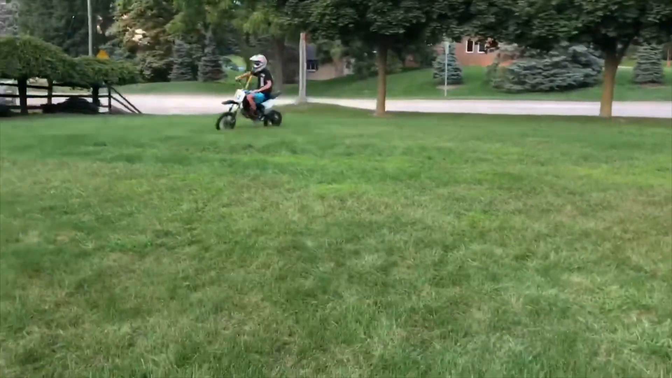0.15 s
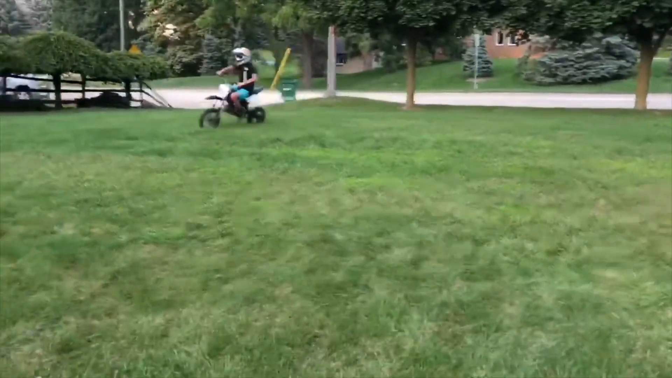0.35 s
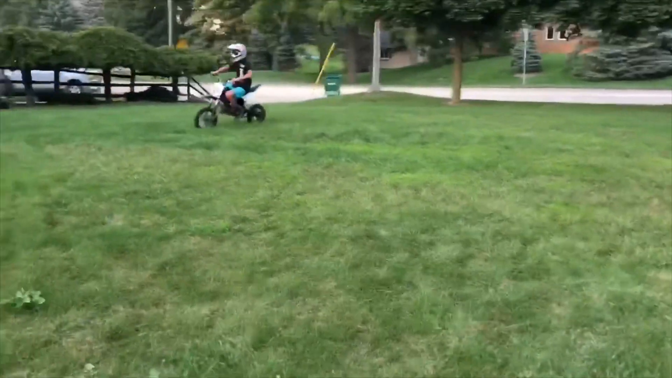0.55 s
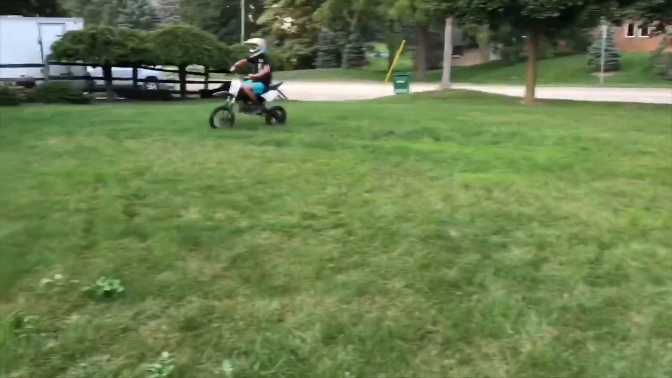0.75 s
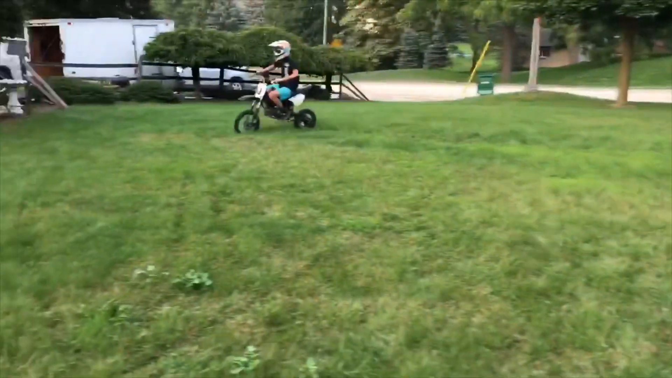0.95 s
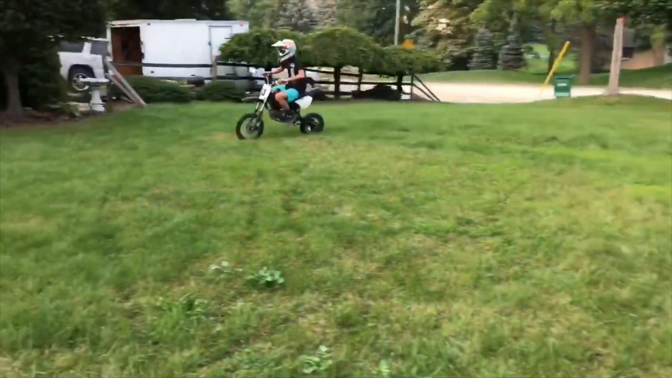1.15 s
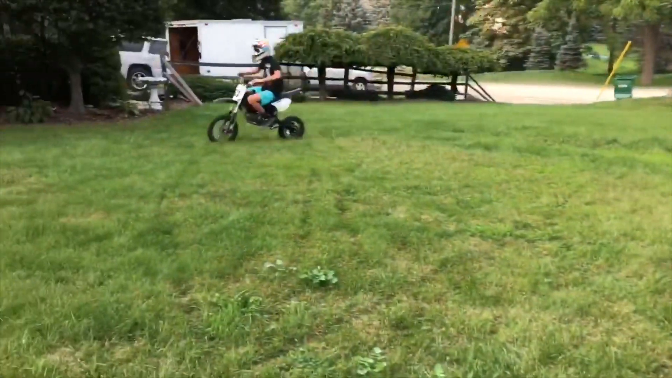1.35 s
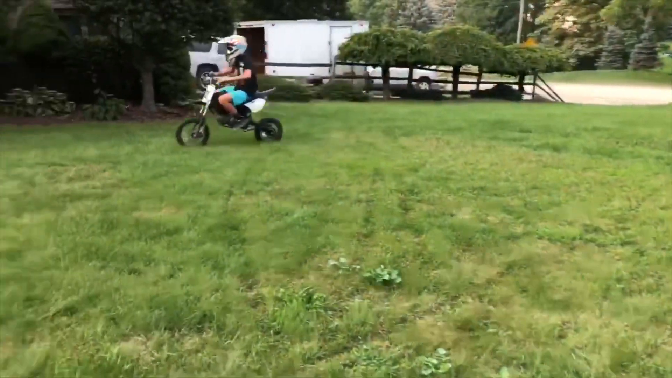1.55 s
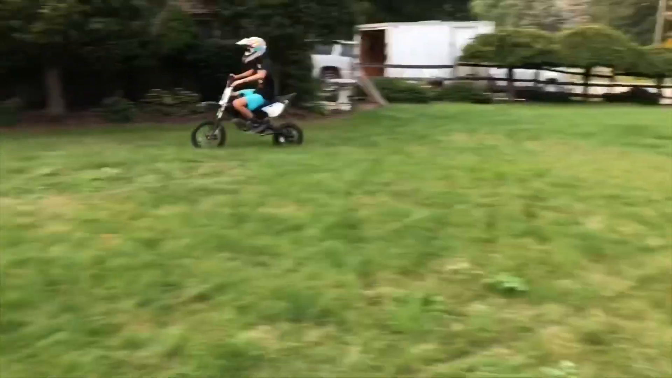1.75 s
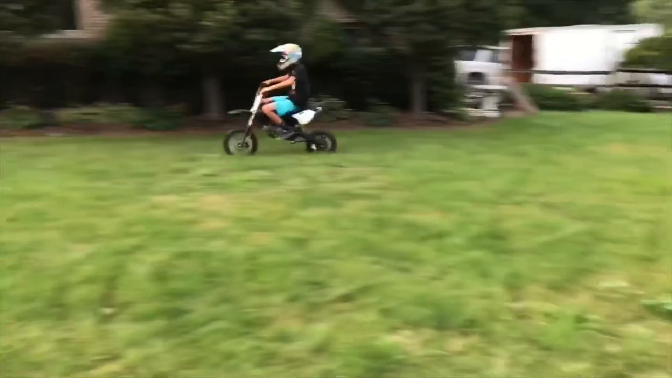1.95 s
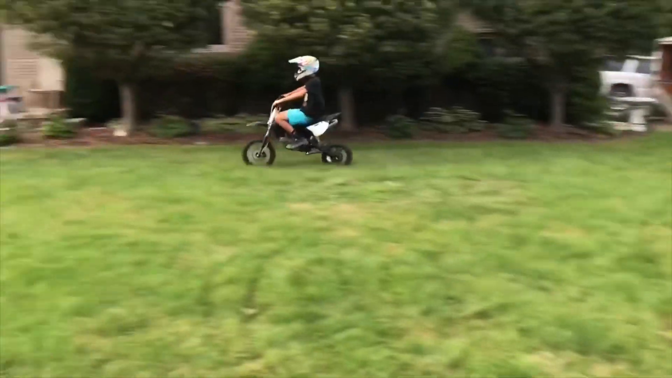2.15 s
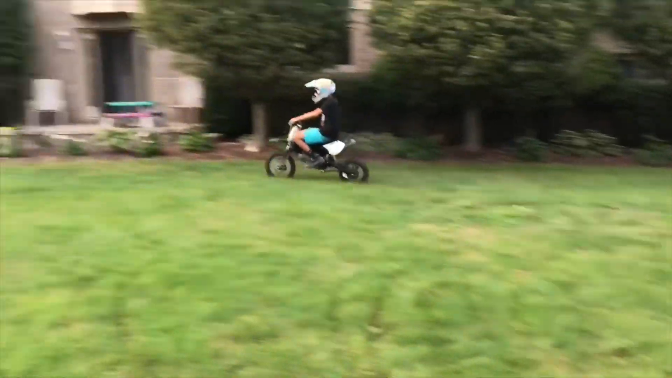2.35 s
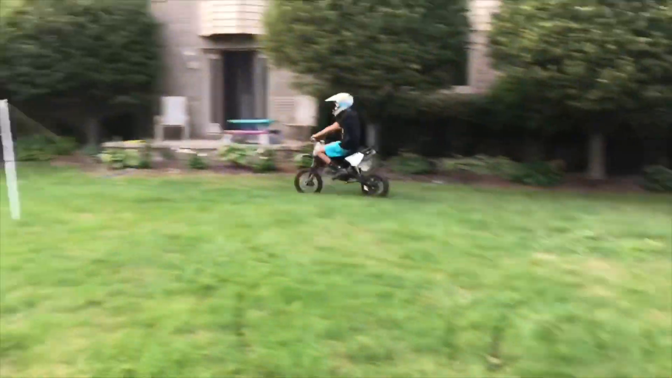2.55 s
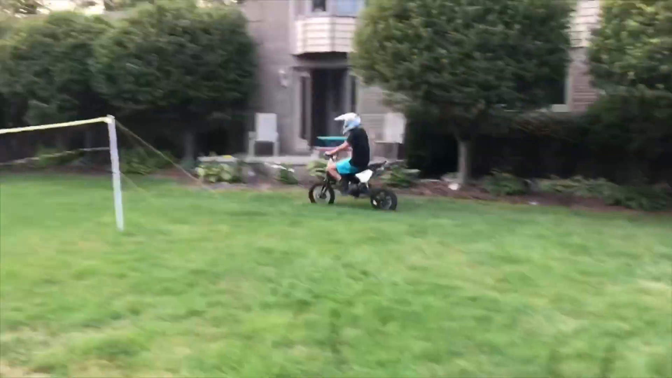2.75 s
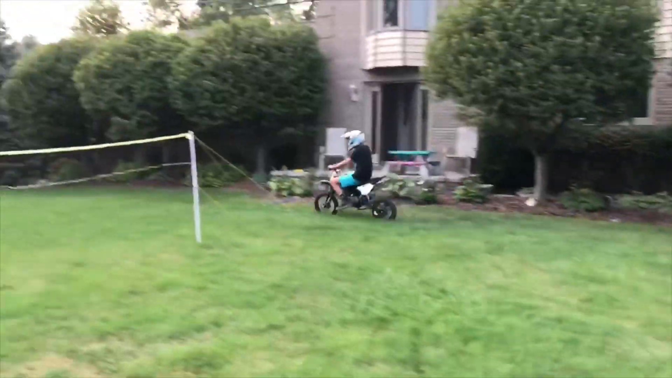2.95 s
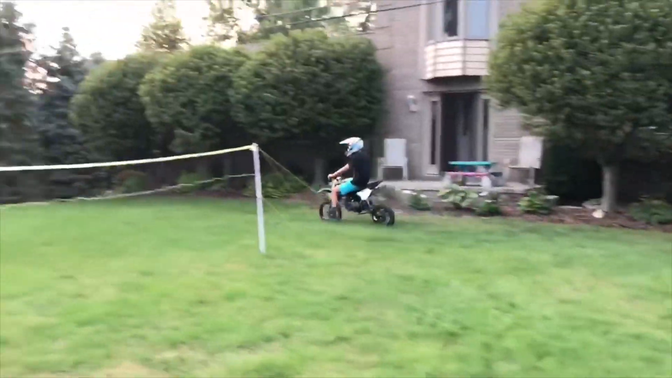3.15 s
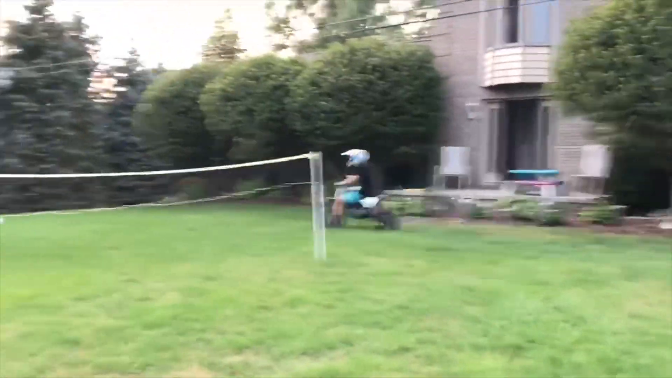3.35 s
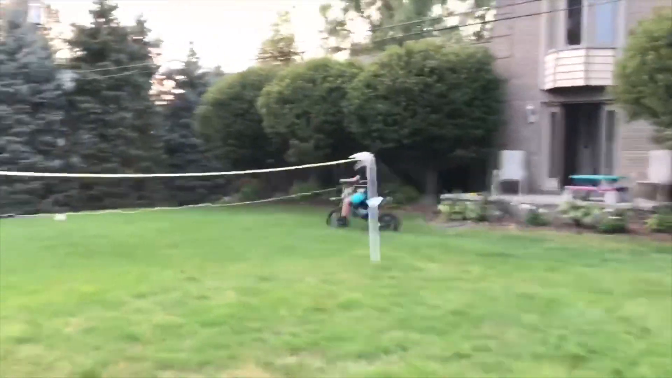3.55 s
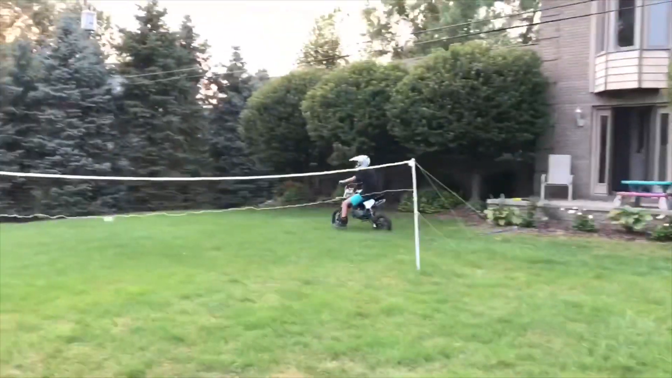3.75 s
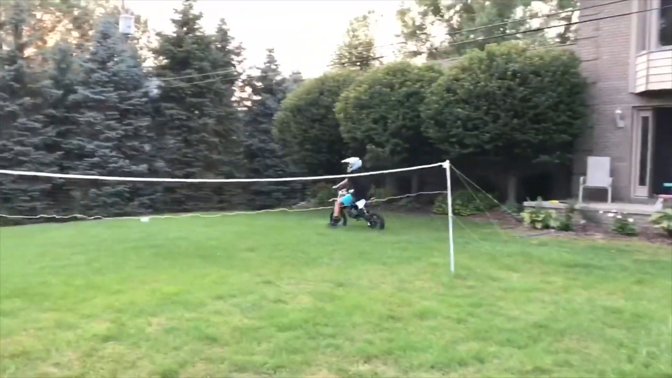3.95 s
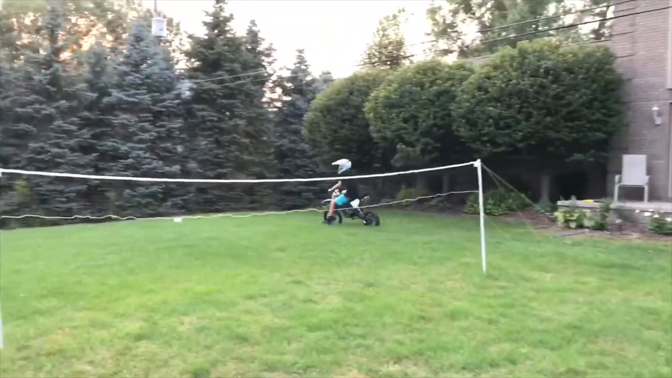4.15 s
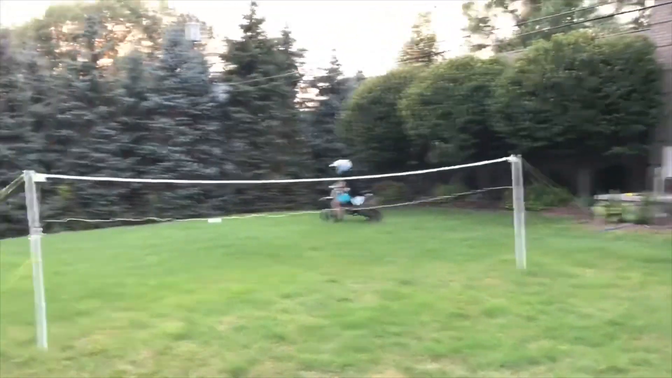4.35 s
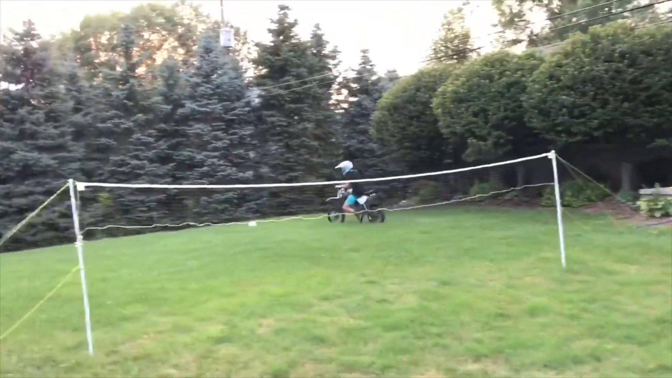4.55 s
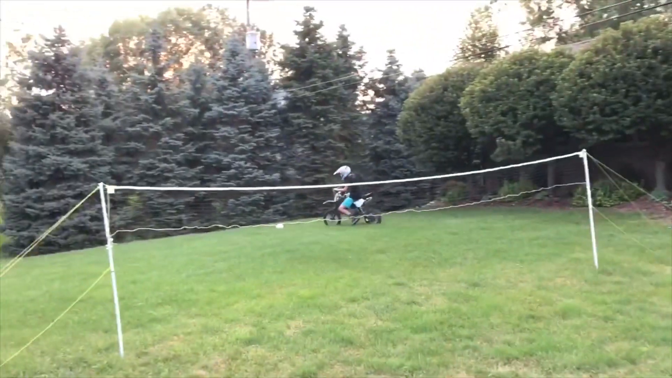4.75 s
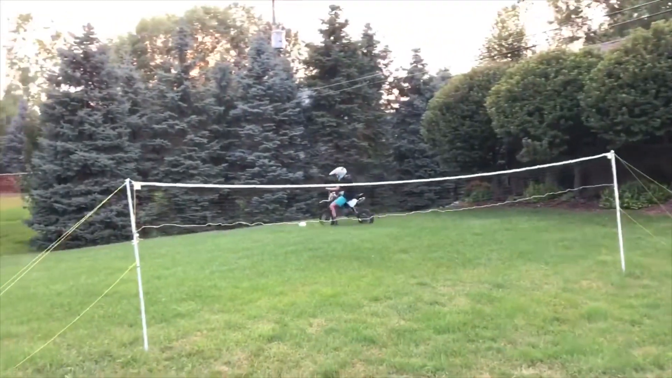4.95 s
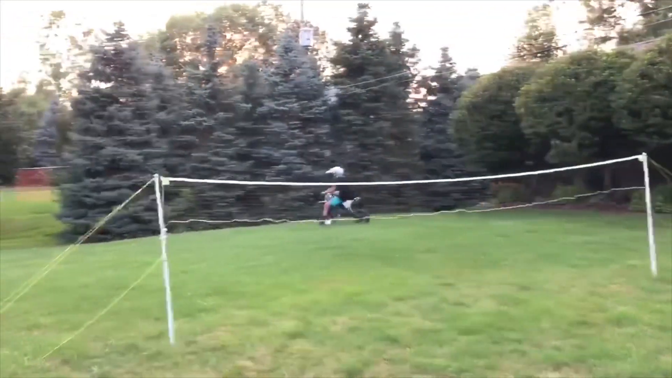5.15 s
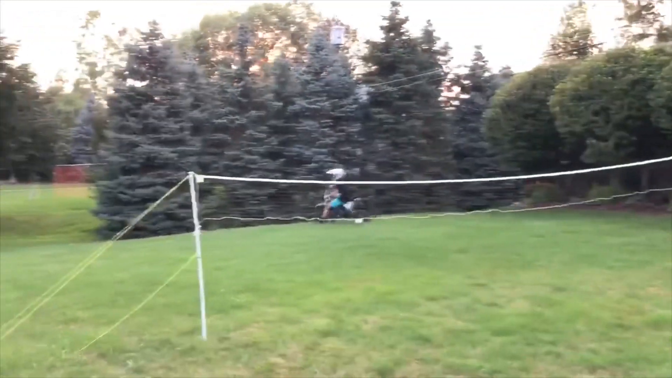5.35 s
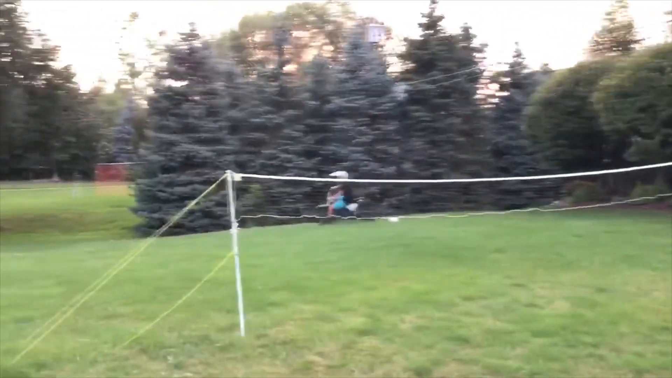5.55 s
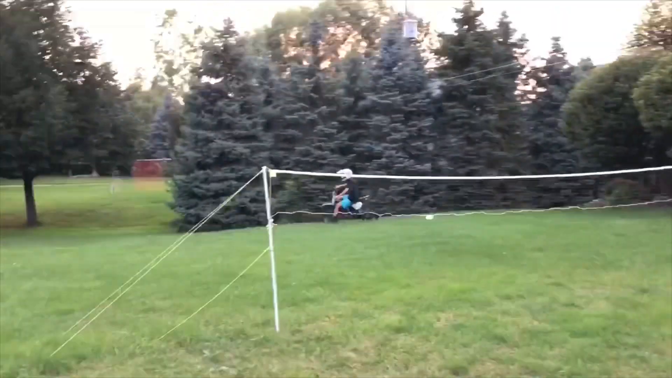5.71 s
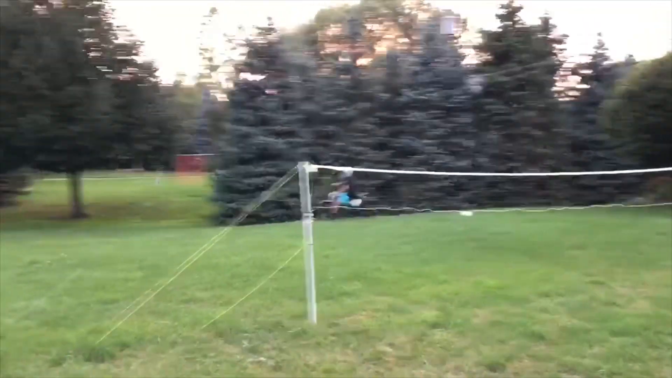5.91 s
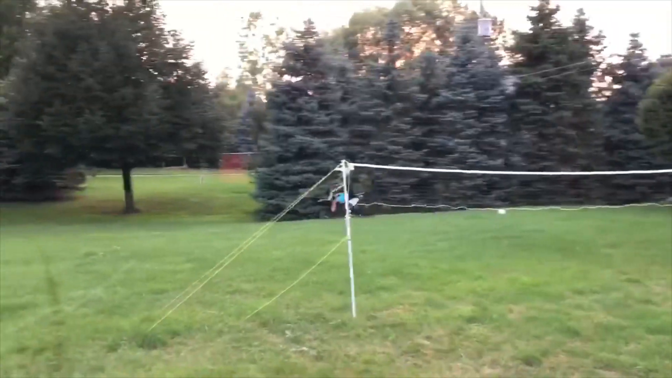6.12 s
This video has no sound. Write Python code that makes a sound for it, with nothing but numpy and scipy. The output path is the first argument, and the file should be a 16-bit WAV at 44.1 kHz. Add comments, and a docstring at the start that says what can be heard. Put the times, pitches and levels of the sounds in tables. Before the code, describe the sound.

Heard from a fixed spot in an open yard, a little single-cylinder bike approaches with short throttle blips, growls by with a longer raspy pull, then coasts down to a slow hollow putter with loose chain rattling. It revs up again facing away, drops, stumbles briefly, and climbs once more as it recedes. Mono, slight wall reflection, quiet air beneath.

```python
"""A small four-stroke single-cylinder motorbike barks at every firing as it is ridden round a lawn and past.
Off the throttle its pipe only booms hollowly as the revs sink; then the bike turns its tail and moves off.
The exhaust is a train of minimum-phase pulses, one a cycle; gas, engine and tyres are shaped noise.
The slack chain slaps over bumps as noise bursts ringing in steel; house and trees return a faint echo."""
import sys
import numpy as np
from scipy import signal
from scipy.fft import rfft, irfft, next_fast_len
from scipy.io import wavfile
from scipy.ndimage import uniform_filter1d

SR = 44100
rng = np.random.default_rng(int(sys.argv[2]) if len(sys.argv) > 2 else 0)


def log_audio(samples):
    """Write samples as a 16-bit WAV file to the path given in sys.argv[1]."""
    # one column per channel
    frames = np.atleast_2d(samples).T
    # limit to full scale, then quantise
    limited = np.clip(frames, -1, 1)
    pcm = np.round(limited * 32767).astype(np.int16)
    wavfile.write(sys.argv[1], SR, pcm)


N = 272538
T = np.arange(N) / SR
TAPS = 4096  # samples in a pulse or impulse response
HZ = np.fft.rfftfreq(TAPS, 1 / SR)

# Exhaust pulse spectra, relative, side-on, from behind and coasting: (f/Hz, level/dB)
LOADED_PULSE = [(25, -89), (42, -27), (52, -17), (80, -3.5), (105, 3.5), (140, -1), (170, -10), (280, -9.5),
                (360, -9.5), (450, -14), (780, -12), (950, -16.5), (1100, -29), (1400, -32), (2400, -46),
                (5000, -37)]
ASTERN_PULSE = [(25, -107), (38, -32), (50, -10), (72, 0.5), (98, 10.5), (145, 2), (200, 5.5), (270, -1),
                (360, -3), (490, -16), (620, -15.5), (800, -23), (1050, -21), (2500, -72.5), (5000, -46)]
HOLLOW_PULSE = [(25, -59), (45, -46), (62, -17), (78, -6.5), (95, 11.5), (125, 4), (195, 3), (250, -3.5),
                (320, -10.5), (385, -29), (620, -29.5), (1100, -35), (1500, -42), (3000, -55.5)]
# Pipe resonances under load, and with cooler gas when coasting: (f/Hz, width/Hz, lift/dB)
HOT_PIPE = [(136.4, 16, 5), (200.7, 33, 10.5), (292.5, 6.8, -6.5), (314, 104, 10), (385.3, 11.5, 4.5),
            (462, 21.5, -8.5), (477.4, 11, 11.5), (730, 400, 9.5)]
COOL_PIPE = [(98.4, 9.1, -1.5), (125, 4.1, 7), (141.8, 5.1, 2), (169, 5.7, -2.5), (184, 17, 2),
             (243, 2.5, 1), (302, 13.5, 3)]


def exhaust():
    """Pipe resonance: sharp pulses excite the pipe under load, round ones when coasting."""
    steady = dict(uneven_db=0.45, bark_uneven_db=0.6, jitter_s=0.00003)
    passing = firings("side-on", read(LOADED_PULSE, HZ) + peaks_db(HOT_PIPE), **steady)
    leaving = firings("astern", read(ASTERN_PULSE, HZ), **steady)
    coasting = firings("coasting", read(HOLLOW_PULSE, HZ) + peaks_db(COOL_PIPE), **steady)
    pulses = gain_of(0.27) * passing + gain_of(-1.0) * leaving + gain_of(0.42) * coasting
    return silencer(silencer(pulses, hz=580, q=0.51), hz=200, q=0.33)


# Uneven firings as the engine stumbles: (t/s, level change/dB)
STUMBLES = [(4.545, -1), (4.573, -11), (4.6, -3.5), (4.625, 3.5), (4.652, -3), (4.7, -2), (4.76, 3.5)]


def firings(state, colour_db, uneven_db, bark_uneven_db, jitter_s):
    """Periodic excitation: one pressure pulse a cycle, whose boom, body and bark follow the engine's effort."""
    times = T[1:][np.diff(np.floor(cycles())) > 0]
    states, levels = effort(times)
    chosen = states == state
    times, levels = times[chosen], levels[chosen, :3]

    # power shares that cross over at 135 Hz and 450 Hz
    above_boom = 1 / (1 + (135 / (HZ + 1)) ** 6)
    above_body = 1 / (1 + (450 / (HZ + 1)) ** 10)
    shares = np.array([1 - above_boom, above_boom - above_body, above_body])
    parts = shares * gain_of(colour_db) ** 2
    parts /= 2 * parts.sum(1, keepdims=True) / TAPS  # each part carries unit energy

    stumble_s, stumble_db = np.transpose(STUMBLES)
    out = np.zeros(N)
    chances = rng.standard_normal((len(times), 3))
    for s, level, (size, bark, late) in zip(times, levels, chances):
        period = 1 / follow(SPEED, s)[0]
        db = level + uneven_db * size + [0, 0, bark_uneven_db * bark]
        db += stumble_db[abs(stumble_s - s) < period / 2].sum()
        power = gain_of(db) ** 2 @ parts * period * SR
        add(out, s + jitter_s * late, causal(np.sqrt(power)))
    return out


def silencer(x, hz, q):
    """All-pass dispersion: a chamber delays the part of each pulse near its resonance, so its pitch sweeps down."""
    _, poles = signal.iirpeak(hz, q, fs=SR)
    return signal.lfilter(poles[::-1], poles, x)


# Engine speed: (t/s, firing rate f/Hz)
SPEED = [(0.0, 44.05), (0.15, 49.41), (0.42, 52.65), (0.6, 47.48), (0.76, 51.93), (1.05, 45.93),
         (1.17, 39.39), (1.28, 42.91), (1.35, 42.67), (1.86, 50.27), (2.01, 52.5), (2.11, 47.08),
         (2.66, 38.14), (3.09, 28.53), (3.28, 32.42), (3.5, 46.78), (3.66, 51.94), (4.08, 39.42),
         (4.49, 37.8), (4.7, 39.01), (4.94, 35.2), (5.33, 36.77), (5.73, 50.21), (6.18, 49.2)]


def cycles(start=0.765):
    """Phase is the integral of rate: engine cycles so far; the exhaust valve opens at each whole number."""
    return start + np.cumsum(follow(SPEED, T)[0]) / SR


# Throttle moves, each held until the next; source levels at NEAR_M and CRUISE_HZ before the sources' own trims:
# (t/s, throttle, boom level/dB, silencer body level/dB, bark level/dB, gas rasp level/dB)
THROTTLE = [(0, "shut", -18, -15, -45, -37), (0.04, "open", -22.5, -20.5, -36.5, -32.5),
            (0.475, "shut", -22.5, -18.5, -45, -39), (0.62, "open", -25, -19.5, -32, -31),
            (0.805, "shut", -22.5, -20.3, -42, -39.5), (1.0, "open", -21, -21.5, -26, -29.5),
            (2.1, "shut", -19.5, -18.5, -44.5, -39.5), (3.13, "open", -26.5, -23, -35, -38),
            (3.735, "shut", -18, -18, -37.5, -37), (4.77, "open", -22, -24, -42.5, -35.5),
            (5.2, "open", -22.5, -19.5, -34.5, -35), (5.9, "open", -26, -21.5, -35, -35.5),
            (6.12, "shut", -19.5, -27, -40, -37)]
# Gain with engine speed, by state: (boom, body, bark, rasp; level/dB per extra firing a second)
REV_DB = {"side-on": (-0.11, -0.15, 0.76, 0.43), "astern": (0.23, 0.23, 0.72, 0.75),
          "coasting": (-0.036, 0.45, 0.74, 0.36)}
NEAR_M, CRUISE_HZ = 8, 45
TURN_S, TURNING_S = 3.19, 0.63  # the bike turns its tail to the listener
# The tuples below are level changes/dB of (boom, body, bark, rasp).
# The charge builds after the throttle opens and thins as it is rolled off.
OPENING_DB, OPENING_S = (0.5, -2.5, -13, -4.5), 0.033
CLOSING_DB, CLOSING_S = (-3, -7.5, -12.5, -6.5), 0.047
# After the throttle shuts the boom takes a moment to build; one that stays open glides to its new setting.
SETTLE_DB, SETTLE_S, GLIDE_S = (-5.5, -1, -2, 1), 0.31, 0.077
# Towards the end of a coast the firings sag, over this share of it.
SAG_DB, SAG_SHARE, SAG_S = (-4, -7.5, -5.5, -2.5), 0.16, 0.013
# Seen side-on, the boom swells where the revs come into tune with the pipe.
TUNED_HZ, TUNED_WIDTH_HZ, TUNED_DB = 52.2, 3.2, 6


def effort(t):
    """Load dependence: engine state, and boom, body, bark and rasp levels from throttle, revs and distance."""
    rate = follow(SPEED, t)[0][:, None]
    states, levels = np.full(len(t), "coasting"), np.zeros((len(t), 4))
    before = THROTTLE[:1] + THROTTLE[:-1]
    after = THROTTLE[1:] + [(N / SR + GLIDE_S, "shut")]
    for (_, was, *old_db), (start, throttle, *db), (end, then, *_) in zip(before, THROTTLE, after):
        now = (t >= start) | (start == THROTTLE[0][0])
        age = np.maximum(t - start, 0)[:, None]
        left = np.maximum(end - t, 0)[:, None]
        if throttle == "shut":
            state = "coasting"
            attack = np.exp(-age / SETTLE_S) * SETTLE_DB
            sag = (1 + np.tanh((SAG_SHARE * (end - start) - left) / SAG_S)) / 2
            release = sag * SAG_DB
        else:
            state = "side-on" if end < TURN_S else "astern"
            if was == "shut":
                attack = np.exp(-age / OPENING_S) * OPENING_DB
            else:
                attack = np.exp(-age / GLIDE_S) * np.subtract(old_db, db)
            release = np.exp(-left / CLOSING_S) * CLOSING_DB * (then == "shut")
        level = db + attack + release + (rate - CRUISE_HZ) * REV_DB[state]
        if state == "side-on":
            level[:, :1] += TUNED_DB / (1 + ((rate - TUNED_HZ) / TUNED_WIDTH_HZ) ** 4)
        states[now], levels[now] = state, level[now]  # later moves overwrite earlier ones
    return states, levels + spreading_db(t)[:, None]


# The ride past: (t/s, distance/m)
PATH = [(0, 17.8), (1, 11.06), (1.95, 9), (3, 11), (4, 13.7), (6.18, 22.7)]


def spreading_db(t):
    """Spherical spreading: pressure falls in inverse proportion to distance."""
    return 20 * np.log10(NEAR_M / follow(PATH, t)[0])


# Gas noise, relative: (f/Hz, level/dB per Hz)
RASP = [(300, 3), (600, -7.5), (900, 3.5), (1100, -8.5), (1400, 2.5), (1700, -1), (2000, -8.5), (2350, -7),
        (3000, -8.5), (4200, -12), (5000, -13.5), (7500, -14.5), (15000, -22)]


def rasp():
    """Modulated jet noise: gas tears out as the exhaust valve opens; the intake draws with a softer rush."""
    turn, slow = cycles(), T[::100]
    states, levels = effort(slow)
    pulling = np.interp(T, slow, states != "coasting")
    level_db = np.interp(T, slow, levels[:, -1])
    tear = 1.7 * burst(turn, at=0.025, width=0.055)
    rush = 0.5 * burst(turn, at=0.73, width=0.55)
    puffs = 0.5 + pulling * (tear + rush)
    puffs /= np.sqrt(uniform_filter1d(puffs ** 2, size=2000))  # keeps the running rms even
    gas = noise(RASP, band=(1150, 2600))
    return gain_of(level_db - 5.5) * puffs * gas


def burst(turn, at, width):
    """Cyclic modulation: a smooth swell once a cycle, centred on the share 'at' of the cycle."""
    return np.exp(-(np.sin(np.pi * (turn - at)) / (np.pi * width)) ** 2)


# Machinery noise, relative, side-on and from behind: (f/Hz, level/dB per Hz)
HISS_SIDE_ON = [(300, -4), (600, 0.5), (1000, 0), (1500, -3), (2500, 3.5), (3300, 1.5), (4200, -0.5),
                (7000, -1.5), (10000, -2.5), (14000, -3), (15800, -10)]
HISS_ASTERN = [(300, -24), (600, 7.5), (950, 0.5), (1400, -11.5), (2000, 5.5), (2600, 3.5), (3500, 5),
               (4500, 2), (7000, -4), (8800, -1), (11000, -3.5), (14000, -2.5), (15800, -15)]
# Machinery level, before each source's own trim: (t/s, level/dB)
HISS_LEVEL = [(0, -40), (0.14, -38.5), (0.42, -39.5), (0.55, -43), (0.74, -39), (0.96, -40), (1.05, -37),
              (1.22, -38.5), (1.7, -35), (2.02, -31), (2.14, -36.5), (2.42, -35.5), (2.7, -38),
              (3.68, -38.5), (3.97, -43), (4.55, -45.5), (5.25, -46.5), (5.5, -42), (5.75, -39.5),
              (6.18, -44)]


def machinery():
    """Broadband friction noise: valve gear, chain rollers and tyres in grass, recoloured as the bike turns away."""
    ticking = 1 + 0.12 * burst(2 * cycles(), at=0.19, width=0.03)  # twice a cycle
    grain = gain_of(2.27 * drift(500) + 1.14 * drift(35))
    side_on, astern = (noise(colour, band=(4000, 15000)) for colour in (HISS_SIDE_ON, HISS_ASTERN))
    turned = np.clip((T - TURN_S) / TURNING_S, 0, 1)
    hiss = np.sqrt(1 - turned) * side_on + np.sqrt(turned) * astern  # equal-power crossfade
    level_db = follow(HISS_LEVEL, T)[0] - 3.5
    return gain_of(level_db) * evened(ticking * grain) * hiss


def panels(x, ring_db=-8, t60=0.044):
    """Modal density: the many close modes of frame, tank and fins ring briefly with the hiss."""
    t = np.arange(TAPS) / SR
    ring = rng.standard_normal(TAPS) * gain_of(-60 * t / t60)
    response = gain_of(ring_db) * ring / np.linalg.norm(ring)
    response[0] += 1  # direct sound
    return signal.oaconvolve(x, response / np.linalg.norm(response))[:N]


# Engine casing and cooling fins: (f/Hz, width/Hz, lift/dB)
CASING = [(1230, 98, 5), (1576, 55, 1.5), (2440, 23, -3), (3320, 200, 2), (4970, 130, 3), (6770, 130, 4),
          (8800, 120, 4.5)]


def casing(x):
    """Structural resonance: the casing and fins lift the sound near their own modes."""
    return signal.oaconvolve(x, causal(gain_of(peaks_db(CASING))))[:N]


# Beat of piston and valve gear, relative: (f/Hz, level/dB per Hz)
KNOCK = [(250, -1), (400, 19), (480, -14), (540, 8), (630, 3), (900, -1), (1100, 9), (1350, -15), (1900, 8),
         (2600, -15), (4000, -14)]


def knock():
    """Harmonic series: piston, cam and tappets nearly repeat each cycle, so wavering lines glide with the revs."""
    turn, rate = cycles(), follow(SPEED, T)[0]
    slow, out = T[::100], np.zeros(N)
    for k in range(8, 60):  # harmonic number
        waver = np.interp(slow * 7, np.arange(50), rng.standard_normal(50))  # 7 random points a second
        line = gain_of(read(KNOCK, k * rate[::100])) * waver
        out += np.interp(T, slow, line) * np.cos(2 * np.pi * (k * turn + rng.random()))
    force = (rate / rate.max()) ** 2  # inertia forces grow with the square of the speed
    level_db = np.minimum(follow(HISS_LEVEL, T)[0], -40) - 1.0
    return gain_of(level_db) * force * evened(out)


# Chain slaps, peaks before a common 1 dB lift: (t/s, peak level/dB, noise decay t60/s)
SLAPS = [(0.9094, -26, 0.025), (1.036, -24, 0.047), (2.173, -19, 0.039), (2.3, -20, 0.024),
         (2.6746, -17.5, 0.036), (2.7893, -25, 0.024), (2.843, -25.5, 0.045), (2.858, -18, 0.028),
         (2.931, -20, 0.018), (2.963, -23.5, 0.032), (3.1652, -16, 0.016), (3.2257, -30, 0.037),
         (3.294, -17, 0.038), (3.38, -32, 0.02), (3.471, -22.5, 0.048), (4.09, -28, 0.032),
         (4.2388, -28, 0.034), (4.301, -22, 0.018), (4.3628, -20, 0.041), (4.451, -21.5, 0.0098),
         (4.5058, -31, 0.048), (4.6147, -31, 0.049), (4.6868, -18, 0.043), (4.756, -21, 0.027),
         (4.836, -28.5, 0.027), (5.0276, -28.5, 0.025), (5.094, -34, 0.028)]
# The chain guide and swing arm: (f/Hz, width/Hz, level/dB)
STEEL = [(2850, 140, 15.5), (3610, 61, 17), (4310, 140, 9.5), (5020, 120, 7.5), (6080, 68, -2),
         (8150, 97, 0), (8820, 210, -2.5), (9650, 95, -20), (11130, 350, 5.5), (13530, 130, 6)]
# Colour of the links' strike, relative: (f/Hz, level/dB)
CLINK = [(1500, -86), (2500, -17), (3200, 7.5), (4300, 5), (6500, 13.5), (9000, 13), (12000, 3),
         (16000, 10.5)]


def chain(ring_db=-3, rebound=0.22, rebound_s=0.015):
    """Impact excitation: each slap is a quick run of links striking the resonant steel guide."""
    t = np.arange(TAPS) / SR
    modes = (gain_of(db) ** 2 / (1 + (2 * (HZ - hz) / width) ** 2) for hz, width, db in STEEL)
    ring = np.sqrt(sum(modes))
    body = causal(gain_of(read(CLINK, HZ)) * (gain_of(-4.5) + gain_of(ring_db) * ring))
    out = np.zeros(N)
    for s, db, t60 in SLAPS:
        rise = 1 - np.exp(-t / 0.0011)
        links = rng.standard_normal(TAPS) * gain_of(-60 * t / t60) * rise
        links *= 1 + rebound * (t > rebound_s * rng.uniform(0.5, 2))
        slap = signal.fftconvolve(links, body)[:TAPS]
        add(out, s, gain_of(db) * slap / abs(slap).max())
    return gain_of(1.0) * out


# The intake knocks as the throttle snaps open: (t/s, peak level/dB, noise decay t60/s)
GULPS = [(0.608, -23, 0.025), (0.9936, -20, 0.011)]


def gulps(hz=1600, width_hz=700):
    """Cavity resonance: a sudden draught of air, a decaying noise burst, knocks in the intake."""
    t, out = np.arange(TAPS) / SR, np.zeros(N)
    airbox = causal(1 / (1 + ((HZ - hz) / width_hz) ** 2))
    for s, db, t60 in GULPS:
        draught = rng.standard_normal(TAPS) * gain_of(-60 * t / t60)
        gulp = signal.fftconvolve(draught, airbox)
        add(out, s, gain_of(db) * gulp / abs(gulp).max())
    return out


# Extra path of the sound thrown back by the house: (t/s, delay/s)
WALL = [(0, 0.046), (1, 0.0388), (1.5, 0.0388), (2.1, 0.0374), (2.7, 0.0335), (3.1, 0.032), (3.7, 0.0252),
        (4.0, 0.0272), (4.7, 0.0276), (5.3, 0.0324), (5.75, 0.0352), (6.18, 0.04)]


def wall(x):
    """Comb interference: one dull reflection with a moving delay makes harmonics swell and fade in turn."""
    dull = signal.sosfilt(signal.butter(2, 2500, fs=SR, output="sos"), x)
    return np.interp(T - follow(WALL, T)[0], T, dull, left=0)


def echoes(x, t60=1.0, delay_s=0.072):
    """Diffuse reflection: sparse, faint returns from walls and trees."""
    t = np.arange(SR // 2) / SR
    sparse = rng.standard_normal(len(t)) * (rng.random(len(t)) < 1500 / SR)  # about 1500 returns a second
    taps = sparse * (t > delay_s) * gain_of(-60 * t / t60)
    return signal.fftconvolve(x, taps / np.linalg.norm(taps))[:N]


# Still air over the lawn, relative: (f/Hz, level/dB per Hz)
YARD = [(20, 0), (60, 12), (150, 46), (400, 0), (1000, -40), (2500, -22), (8000, -57), (15800, -50)]


def yard():
    """Stationary background noise: the still air over the lawn, a steady coloured noise."""
    return gain_of(-54) * noise(YARD)


def peaks_db(modes):
    """Superposition of resonances: the summed lift in dB at each frequency."""
    return sum(db / (1 + ((HZ - hz) / width) ** 2) for hz, width, db in modes)


def causal(gain):
    """Minimum phase: the pulse with this magnitude spectrum, its energy as early as possible."""
    cepstrum = irfft(np.log(np.maximum(gain, gain.max() * 1e-5)))
    cepstrum[1:TAPS // 2] *= 2  # fold the cepstrum onto positive time
    cepstrum[TAPS // 2 + 1:] = 0
    return irfft(np.exp(rfft(cepstrum)))


def noise(spectrum, band=(0, np.inf)):
    """Spectral shaping: coloured noise whose rms inside the band is 1."""
    size = next_fast_len(N, real=True)
    hz = np.fft.rfftfreq(size, 1 / SR)
    z = rfft(rng.standard_normal(size)) * gain_of(read(spectrum, hz))
    in_band = irfft(z * (hz > band[0]) * (hz < band[1]), size)
    return irfft(z, size)[:N] / in_band.std()


def drift(rate):
    """Low-frequency random modulation: 'rate' chance points a second joined by lines, rms 1."""
    return evened(np.interp(T * rate, np.arange(N), rng.standard_normal(N)))


def gain_of(db):
    """Logarithmic level: decibels to amplitude."""
    return 10 ** (np.asarray(db) / 20)


def evened(x):
    """Effective value: scales to rms 1."""
    return x / np.sqrt(np.mean(x ** 2) + 1e-20)


def read(points, hz):
    """Logarithmic pitch axis: interpolates a spectrum table at the frequencies hz."""
    f, value = np.transpose(points)
    return np.interp(np.log(hz + 1), np.log(f + 1), value)


def follow(rows, t):
    """Linear interpolation: every column of a curve table at the times t."""
    s, *columns = np.transpose(rows)
    return [np.interp(t, s, c) for c in columns]


def add(mix, s, sound):
    """Linear superposition: mixes a sound in at the time s."""
    part = mix[max(round(s * SR), 0):][:len(sound)]
    part += sound[:len(part)]


def scene():
    """Superposition of direct and reflected sound: the bike, its echoes and the still air of the yard."""
    metallic = casing(rasp() + panels(machinery()))
    bike = exhaust() + knock() + metallic + gulps() + chain()
    echo = gain_of(-11.5) * wall(bike) + gain_of(-21) * echoes(bike)
    return (bike + echo + yard())[None]


def record(dry):
    """Band limitation: a low cut at 28 Hz and a steep treble limit at 16 kHz."""
    lowpass = signal.firwin(511, 16000, window=("kaiser", 9), fs=SR)
    lowcut = signal.butter(2, 28, "high", fs=SR, output="sos")
    return signal.oaconvolve(signal.sosfiltfilt(lowcut, dry), lowpass[None], "same")


dry = scene()
out = record(dry)
log_audio(out)
```